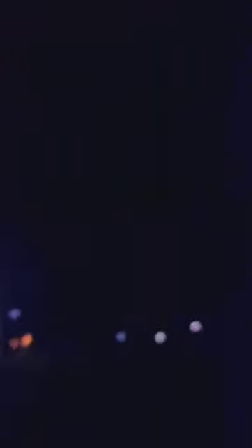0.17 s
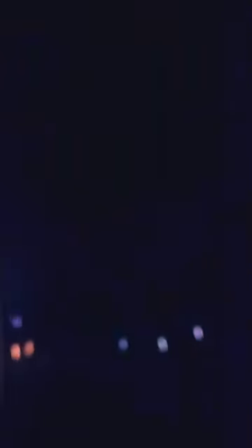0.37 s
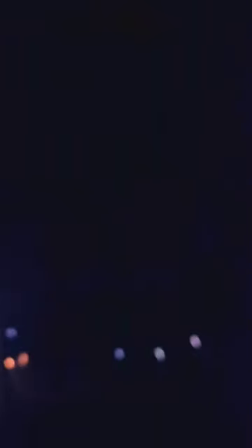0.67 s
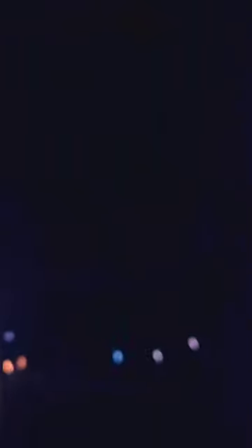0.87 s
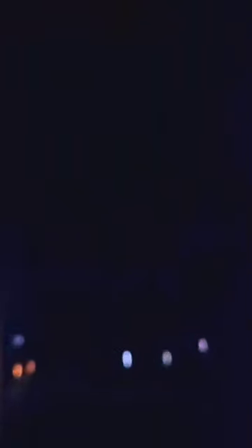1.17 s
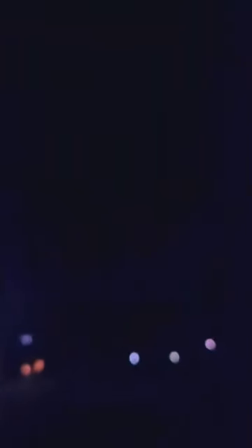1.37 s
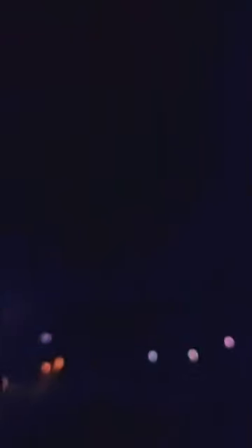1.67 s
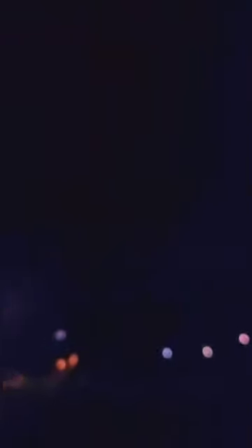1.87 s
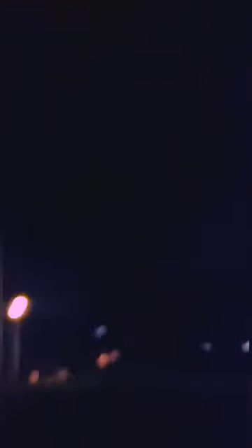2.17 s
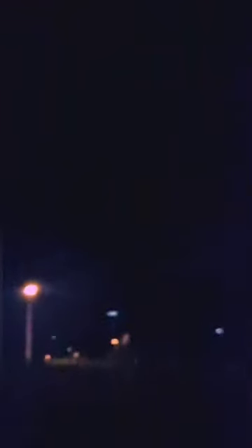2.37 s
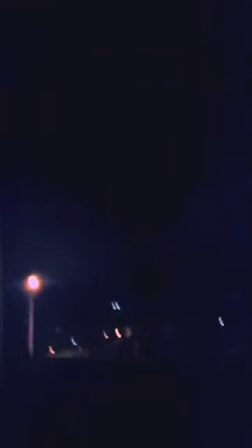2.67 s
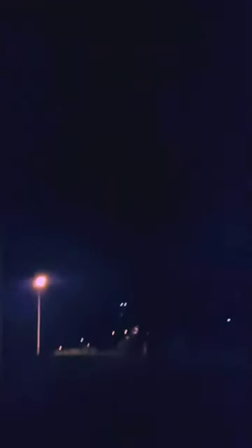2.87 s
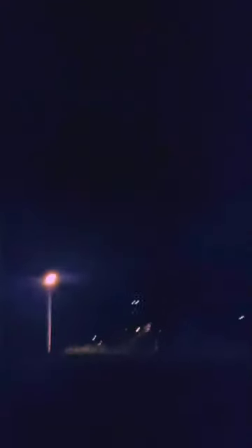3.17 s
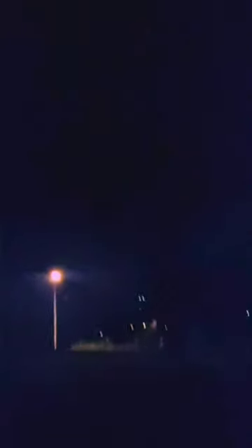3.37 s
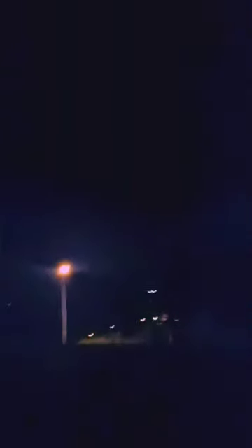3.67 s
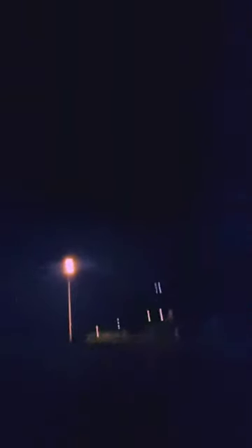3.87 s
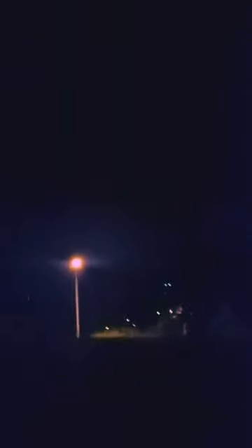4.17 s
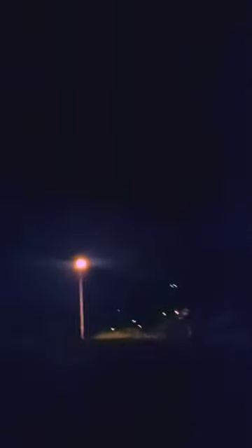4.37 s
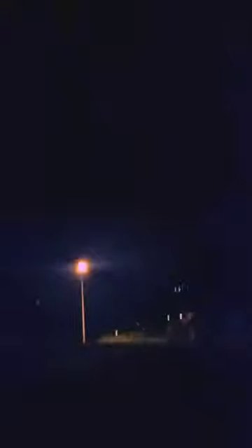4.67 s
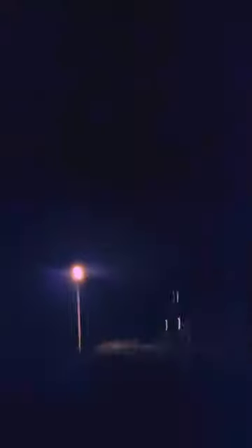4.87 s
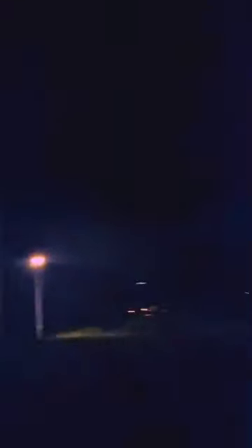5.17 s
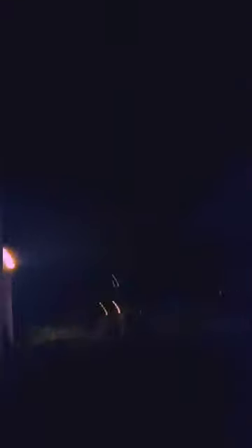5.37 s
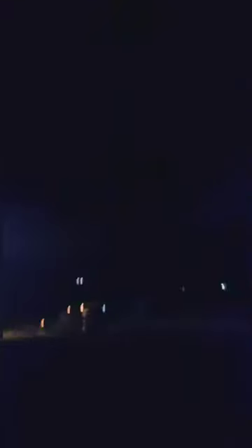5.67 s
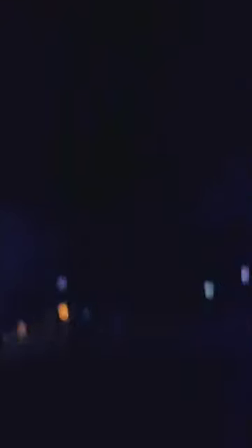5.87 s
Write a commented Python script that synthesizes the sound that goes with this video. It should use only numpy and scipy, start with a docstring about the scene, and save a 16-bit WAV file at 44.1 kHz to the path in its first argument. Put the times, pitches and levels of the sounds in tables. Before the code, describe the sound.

Night, open ground near a wall, handheld stereo phone. A deep gunshot is already sounding at 0 s; until about 3.5 s, around twenty-five shots follow irregularly, often 0.1 to 0.3 s apart. Most are full, low booms, strongest around 1 to 3 s; brighter, sharper cracks fall between them, some weaker, with a strong one near 2.8 s. Each is compact, rattles off nearby surfaces, slaps back from the wall about 0.07 s later and rolls away; the echo gradually lags further. After a short gap, a sharp and a muffled shot nearly coincide at 4.1 s, then weaker dull ones come at 4.4, 4.6 and 5.15 s with brighter smeared echoes. Quiet clothing swishes mark steps every half second. Dry handling ticks appear faintly at 3.2 and 4.7 s, clustering at 5.2 to 5.8 s, the sharpest near 5.3 s. Low town hum and faint hiss remain as tails fade by 6 s.

```python
"""Open ground at night, beside a wall and a town: deep and sharp shots alternate, and a few muffled ones come late.
Each blast is a compact pulse that rattles between nearby surfaces, slaps back from the wall and rolls away.
The listener walks away from the wall with the phone in hand, so the echo comes later with every shot.
Under it are rustling steps of shaped noise, a few resonant handling ticks, the low hum of the town
and the microphone's hiss."""
import sys
import numpy as np
from scipy import signal
from scipy.fft import rfft, irfft
from scipy.io import wavfile

SR = 44100
rng = np.random.default_rng(int(sys.argv[2]) if len(sys.argv) > 2 else 0)


def log_audio(samples):
    """Write samples as a 16-bit WAV file to the path given in sys.argv[1]."""
    # one column per channel
    frames = np.atleast_2d(samples).T
    # limit to full scale, then quantise
    limited = np.clip(frames, -1, 1)
    pcm = np.round(limited * 32767).astype(np.int16)
    wavfile.write(sys.argv[1], SR, pcm)


N = 265878
SIZE = 65536  # samples in one shot or tick, with its tail
AGE = np.arange(SIZE) / SR  # s since the sound began
HZ = np.fft.rfftfreq(SIZE, 1 / SR)


def undb(db):
    """Decibels to gain."""
    return 10 ** (np.asarray(db) / 20)


def colour(points, hz):
    """Read (freq_hz, value) points on a log-frequency axis."""
    freq_hz, value = np.transpose(points)
    return np.interp(np.log(hz + 1), np.log(freq_hz), value)


def causal(db):
    """Response of the most compact pulse with this spectrum: its cepstrum is folded to positive time."""
    cepstrum = irfft(db * np.log(10) / 20)
    cepstrum[1:SIZE // 2] *= 2
    cepstrum[SIZE // 2 + 1:] = 0
    return np.exp(rfft(cepstrum))


# how alike left and right are in diffuse sound: freq_hz, correlation
LIKENESS = [(60, 0.9), (140, 0.96), (300, 0.96), (600, 0.71), (1200, 0.36), (2200, 0.047), (10000, 0)]


def diffuse(points, size):
    """Stereo noise of a given colour: alike in the bass, unrelated in the treble."""
    hz = np.fft.rfftfreq(size, 1 / SR)
    mid, side = rfft(rng.standard_normal((2, size))) * undb(colour(points, hz))
    alike = np.clip(colour(LIKENESS, hz), -1, 1)
    mid = mid * np.sqrt((1 + alike) / 2)
    side = side * np.sqrt((1 - alike) / 2)
    return irfft([mid + side, mid - side], size)


def wander(rate_hz, size):
    """Smooth random drift with a spread near 1, from straight lines between random points."""
    points = rng.standard_normal(4096)
    return 1.2 * np.interp(np.arange(size) / SR * rate_hz, np.arange(4096), points)


def cloud(points, db, rise_s, t60, patchy_db):
    """Response of many small echoes that build up and die away; db is their summed energy."""
    decay = undb(-60 * AGE / t60 + patchy_db * wander(150, SIZE))
    envelope = (1 - np.exp(-AGE / rise_s)) * decay
    echoes = diffuse(points, SIZE) * envelope / np.linalg.norm(envelope)
    return rfft(echoes) * undb(db)


def delay(s):
    """Response of a travel time."""
    return np.exp(-2j * np.pi * HZ * s)


def add(out, s, sound):
    """Mix a sound in from time s; it may have begun before the scene."""
    start = int(s * SR)
    part = sound[:, max(-start, 0):N - start]
    first = max(start, 0)
    out[:, first:first + part.shape[1]] += part


# colour of the town hum: freq_hz, relative_level_db
TOWN_COLOUR = [(20, -33.5), (40, -21.5), (70, -2.5), (137, -2), (250, -9), (500, -11), (700, -13),
               (1100, -16.5), (1700, -22), (2500, -19.5), (3300, -32), (4300, -55.5)]


def town(level_db=-54.5, waver_db=1.5, waver_hz=14, below_hz=250):
    """Distant hum of the town: coloured noise whose bass wavers."""
    hum = diffuse(TOWN_COLOUR, N)
    lowpass = signal.butter(2, below_hz, fs=SR, output="sos")
    bass = signal.sosfiltfilt(lowpass, hum)
    hum = hum + bass * (undb(waver_db * wander(waver_hz, N)) - 1)
    return hum / hum.std() * undb(level_db)


# colour of the hiss, with an uneven treble: freq_hz, relative_level_db
HISS_COLOUR = [(2000, -3), (5000, 1), (7000, 5.5), (9000, -2.5), (10200, -7), (11400, -2), (12400, -12.5),
               (13600, -4), (15500, -8.5)]


def hiss(level_db=-73):
    """Steady self-noise of the microphone: coloured noise."""
    noise = diffuse(HISS_COLOUR, N)
    return noise / noise.std() * undb(level_db)


SOUND_M_S = 343
WALL_M, WALK_M_S = 11.9, 1.19  # distance to the wall at the start, and the pace away from it
BEYOND_WALL_DB, BEYOND_WALL_T60 = -8, .3


def wall_echo(s, wall, smear_db, smear_t60, second_slap_db):
    """The wall returns a knock, a smear from its rough face, a slower wash and a second round trip."""
    trip = delay(2 * (WALL_M + WALK_M_S * s) / SOUND_M_S)
    slap = causal(colour(wall, HZ))
    smear = cloud(wall, smear_db, rise_s=.0005, t60=smear_t60, patchy_db=2)
    beyond = cloud(wall, BEYOND_WALL_DB, rise_s=.007, t60=BEYOND_WALL_T60, patchy_db=1.8)
    second_slap = cloud(wall, second_slap_db, rise_s=.007, t60=.18, patchy_db=3)
    return trip * (slap + smear + beyond + trip * second_slap)


# colour of the fine scatter around the direct blast: freq_hz, level_re_blast_db
SCATTER_COLOUR = [(60, -20.5), (300, -11), (600, -2), (900, 1), (1500, 1.5), (3000, -1), (8000, -9.5)]
# colour of the tail that rolls away over the lot: freq_hz, level_re_blast_db
ROLL_COLOUR = [(40, 16.5), (80, 5.5), (200, -0.5), (400, 1.5), (700, 2), (1200, 2.5), (2500, 3),
               (6000, 2.5)]
# echo change per second of the walk, scaled by walk_share: level in dB, treble in dB per octave
ECHO_DB_PER_S, ECHO_TILT_DB_PER_S = -2.5, 1.94
TAIL_VIA_PATHS = 0.26  # share of the nearby reflections that also colours the rolling tail


def gunfire(shots, blast, paths, wall, tilt_db, dulling, screened_share, echo_db, walk_share, smear_db, smear_t60,
            scatter_db, scatter_t60, second_slap_db, lot_db, lot_t60, roll_db, roll_t60, port_ms):
    """Each blast arrives directly, from the wall and as a rolling tail; nearby surfaces repeat all three.
    Levels and tilts (dB per octave) are those of the average shot in the table. A weaker shot is partly screened:
    it is duller by `dulling` dB per octave for each dB; echo and tail regain `screened_share` of the loss."""
    out = np.zeros((2, N))
    octaves = np.log2(np.clip(HZ, 300, 3000) / 300)
    mean_s, mean_db = np.mean(shots, axis=0)
    for s, db in shots:
        weaker_db = mean_db - db
        walked_s = walk_share * (s - mean_s)
        pulse = causal(colour(blast, HZ) + (tilt_db - dulling * weaker_db) * octaves)
        pulse *= undb(db) / np.abs(irfft(pulse)).max()
        # each reflection comes from its own side, so it reaches the two ports at different times
        near = 0
        for ms, drift, gain in paths:
            arrival_ms = ms + drift * s + port_ms * rng.standard_normal((2, 1))
            near = near + gain * delay(arrival_ms / 1000)
        scatter = cloud(SCATTER_COLOUR, scatter_db, rise_s=.003, t60=scatter_t60, patchy_db=3)
        direct = 1 + near + scatter
        # the echo escapes half of the dulling
        echo_tilt = ECHO_TILT_DB_PER_S * walked_s + dulling * weaker_db / 2
        echo_gain = undb(echo_db + ECHO_DB_PER_S * walked_s + echo_tilt * octaves)
        echo = echo_gain * (1 + near) * wall_echo(s, wall, smear_db, smear_t60, second_slap_db)
        lot = cloud(ROLL_COLOUR, lot_db, rise_s=0.0012, t60=lot_t60, patchy_db=2.5)
        roll = cloud(ROLL_COLOUR, roll_db, rise_s=0.042, t60=roll_t60, patchy_db=3)
        tail = (lot + roll) * (1 + TAIL_VIA_PATHS * near)
        reflected = undb(screened_share * weaker_db) * (echo + tail)
        add(out, s, irfft(pulse * (direct + reflected)))
    return out


# wall colour for the deep and sharp shots: freq_hz, level_re_blast_db
WALL_COLOUR = [(60, -14), (250, -5), (480, -4), (680, -1), (850, 4.5), (1100, 6), (1700, -3), (2500, -2.5),
               (6000, -8.5)]
# deep shots, from more than one gun, one begun before the opening: start_s, pulse_peak_db
DEEP_SHOTS = [(-.007, -8.5), (.4019, -11.5), (.5608, -7.5), (.8253, -6.5), (1.0738, -6), (1.3327, -5.5),
              (1.5862, -5.5), (1.8501, -4.5), (2.0433, -9), (2.1099, -6.5), (2.383, -4.5), (2.6547, -6.5),
              (2.6811, -6.5), (2.9369, -5.5), (3.2099, -6), (3.4887, -6.5)]
# their shared blast before tilt: freq_hz, relative_level_db
DEEP_BLAST = [(30, -48), (80, -16.5), (150, -8.5), (200, 0), (300, -1.5), (400, -2), (680, -2.5), (850, -8),
              (1050, -12.5), (1400, -19), (2300, -21.5), (3200, -37), (5000, -59.5), (9000, -75),
              (16000, -83)]
# their nearby reflections: delay_ms at the start, drift_ms_per_s as the listener moves, gain
DEEP_PATHS = [(1.743, -0.0144, 1.08), (3.167, 0.03, 0.4), (2.374, -0.333, -0.31), (4.016, 0.568, 0.51),
              (4.89, .03, 0.21), (5.405, 0.488, -0.46), (8.14, -0.022, 0.4), (9.66, .03, 0.28),
              (12.27, 0.49, 0.32), (12.78, 0.018, -0.26)]


def deep_shots():
    """Full, low blasts whose wall echo softens and brightens with the walk."""
    return gunfire(DEEP_SHOTS, DEEP_BLAST, DEEP_PATHS, WALL_COLOUR, tilt_db=1.05, dulling=.25,
                   screened_share=0.57, echo_db=-11.5, walk_share=1.3, smear_db=-7.5, smear_t60=0.11,
                   scatter_db=0.0, scatter_t60=0.078, second_slap_db=-25,
                   lot_db=-8, lot_t60=0.7, roll_db=-14.5, roll_t60=1.06, port_ms=0.052)


# sharp shots: start_s, pulse_peak_db
SHARP_SHOTS = [(.2506, -11), (.4513, -8.5), (.6758, -10), (1.3063, -16.5), (1.4984, -11.5), (1.8142, -14.5),
               (2.173, -17), (2.4375, -16.5), (2.7959, -7), (4.1207, -8)]
# their blast before tilt: freq_hz, relative_level_db
SHARP_BLAST = [(30, -47.5), (100, -21.5), (270, 2.5), (700, -1.5), (1000, -3.5), (1500, -1.5), (2200, -5.5),
               (3200, -21), (4500, -32.5), (6500, -38), (8500, -61.5), (16000, -66)]
# their nearby reflections: delay_ms at the start, drift_ms_per_s, gain
SHARP_PATHS = [(0.502, 0.0027, -0.32), (1.651, .02, 0.41), (3.899, 0.253, 0.33), (4.4, .3, -.4)]


def sharp_shots():
    """Brighter blasts with short scatter, a smeared wall echo and a long roll."""
    return gunfire(SHARP_SHOTS, SHARP_BLAST, SHARP_PATHS, WALL_COLOUR, tilt_db=.5, dulling=0,
                   screened_share=0.52, echo_db=-15.5, walk_share=0, smear_db=-1.5, smear_t60=.1,
                   scatter_db=0.5, scatter_t60=0.033, second_slap_db=-21.5,
                   lot_db=-9.5, lot_t60=.4, roll_db=-11.0, roll_t60=1.6, port_ms=0.057)


# footfalls: centre_s, rustle_level_db, half_length_s
STEPS = [(0.437, -66, 0.076), (0.95, -60, 0.13), (1.45, -62, 0.063), (1.971, -54.5, 0.041),
         (2.58, -62, 0.1), (3.086, -56.5, 0.041), (3.597, -53.5, .05), (4.121, -52, 0.041),
         (4.617, -60.5, 0.023), (5.122, -62.5, 0.07), (5.65, -65.5, 0.1)]
# colour of the rustle as heard, with an uneven treble: freq_hz, relative_level_db
RUSTLE_COLOUR = [(1000, 2.5), (2500, 12.5), (4000, 3), (7000, 5.5), (9000, 0), (10200, -8), (11400, -2),
                 (12400, -12), (13600, -6), (15500, -10.5)]
# the trailing leg swishes after every footfall
SWING_AFTER_S, SWING_DB, SWING_HALF_S = 0.13, -65.5, 0.051


def steps(grain_db=2.5):
    """Grainy swish of clothes: noise swells with every footfall and as the other leg swings through."""
    t = np.arange(N) / SR

    def swell(s, db, half_s):
        """Smooth rise and fall around time s."""
        return undb(db) * np.exp(-((t - s) / half_s) ** 2)

    strides = np.zeros(N)
    for s, db, half_s in STEPS:
        strides += swell(s, db, half_s) + swell(s + SWING_AFTER_S, SWING_DB, SWING_HALF_S)
    swish = diffuse(RUSTLE_COLOUR, N) * undb(grain_db * wander(400, N))
    return swish / swish.std() * strides


# handling ticks and scuffs: start_s, peak_db, centre_hz, t60_s
TICKS = [(3.181, -33.5, 2630, 0.025), (4.74, -29.5, 1570, 0.25), (5.19, -34, 2200, 0.56),
         (5.255, -26, 1400, 0.4), (5.2814, -21.5, 2100, 0.0048), (5.619, -35.5, 1290, 0.067),
         (5.7106, -28.5, 2250, .06), (5.755, -30.5, 1360, .33)]


def ticks(width_octaves=0.51, skirt_db=19, left_db=-3, left_late_s=0.00036, top_hz=2950, click_db=-38,
          thud_hz=680, thud_octaves=.6, thud_db=-5):
    """Dry knocks close to the phone, from the right: a bare click, a rattling body and a duller thud."""
    out = np.zeros((2, N))

    def hump(centre_hz, width):
        """Resonance with sloping skirts."""
        offset = np.log2((HZ + 1) / centre_hz) / width
        return undb(-skirt_db * np.log10(1 + offset ** 2))

    for s, db, centre_hz, t60 in TICKS:
        resonance = hump(centre_hz, width_octaves) + undb(thud_db) * hump(thud_hz, thud_octaves)
        top_cut_db = 10 * np.log10(1 + (HZ / top_hz) ** 10)
        body = causal(20 * np.log10(resonance) - top_cut_db)
        rattle = rng.standard_normal(SIZE) * undb(-60 * AGE / t60)
        knock = (1 + rfft(rattle / np.linalg.norm(rattle))) * body + undb(click_db)
        left = knock * delay(left_late_s) * undb(left_db)
        tick = irfft([left, knock])
        add(out, s, tick * undb(db) / np.abs(tick).max())
    return out


# the last, muffled shots: start_s, pulse_peak_db
MUFFLED_SHOTS = [(4.1142, -14), (4.3782, -22), (4.609, -24), (5.1545, -25.5)]
# their blast before tilt: freq_hz, relative_level_db
MUFFLED_BLAST = [(30, -55), (80, -10), (180, 4), (390, 1), (680, -13), (1100, -16.5), (1600, -25.5),
                 (2300, -24.5), (3200, -42), (5000, -74), (16000, -76)]
# their nearby reflections: delay_ms at the start, drift_ms_per_s, gain
MUFFLED_PATHS = [(2.4, 0.018, 0.067), (4.6, 0.055, 0.3), (7.3, 0.053, 0.25), (9.9, 0.035, 0.38)]
# they reach the wall unscreened, so their echo is brighter than the direct sound: freq_hz, level_re_blast_db
MUFFLED_WALL = [(60, -5), (150, -1), (340, -8.5), (520, 6.5), (800, 11.5), (1100, 12.5), (1600, 12),
                (2500, 11.5), (6000, 9)]


def muffled_shots():
    """Dull direct blasts in heavy scatter, with a brighter, long-smeared wall echo."""
    return gunfire(MUFFLED_SHOTS, MUFFLED_BLAST, MUFFLED_PATHS, MUFFLED_WALL, tilt_db=0.7, dulling=0.64,
                   screened_share=0.14, echo_db=-10, walk_share=0, smear_db=0, smear_t60=0.21,
                   scatter_db=6.5, scatter_t60=0.07, second_slap_db=-4.5,
                   lot_db=-9.5, lot_t60=0.71, roll_db=-8.5, roll_t60=0.79, port_ms=0.026)


def scene():
    """The shots over the steps, the ticks and the night air."""
    night = town() + hiss()
    shots = deep_shots() + sharp_shots() + muffled_shots()
    return night + shots + steps() + ticks()


# phase of the left port against the right: freq_hz, phase_rad (positive leads)
PORT_PHASE = [(20, 0), (150, -.08), (600, -.35), (1200, -.3), (1750, -1.5), (2400, -1.8), (3500, -2.2)]
# balance of the ports: freq_hz, left_minus_right_db
PORT_BALANCE = [(100, 0), (600, -0.3), (1100, 0.5), (2200, 0), (4000, -3), (8000, -1.5), (12000, 0)]
TOP_HZ, FADE_IN_S = 15700, .003


def record(dry):
    """The two microphone ports differ in phase and colour; the start is faded in and the top is cut."""
    hz = np.fft.rfftfreq(N, 1 / SR)
    balance = undb(colour(PORT_BALANCE, hz) / 2)
    left = balance * np.exp(1j * colour(PORT_PHASE, hz))
    ports = np.array([left, 1 / balance])
    fade = np.minimum(np.arange(N) / SR / FADE_IN_S, 1)
    heard = irfft(rfft(dry * fade) * ports, N)
    lowpass = signal.ellip(8, .2, 70, TOP_HZ, fs=SR, output="sos")
    return signal.sosfilt(lowpass, heard)


dry = scene()
out = record(dry)
log_audio(out)
```